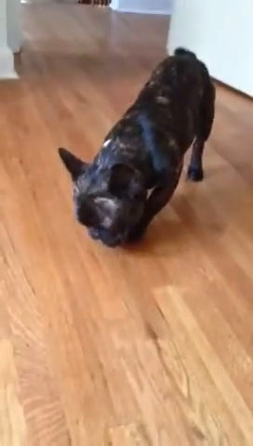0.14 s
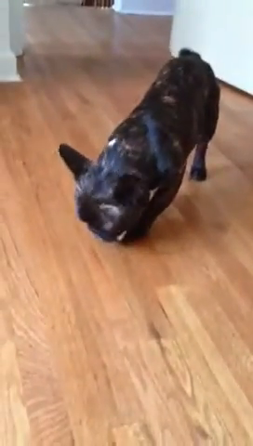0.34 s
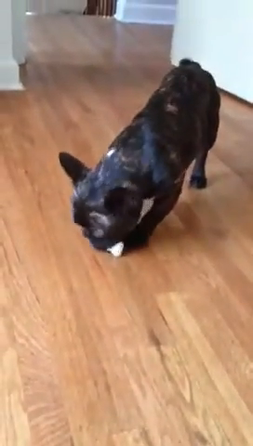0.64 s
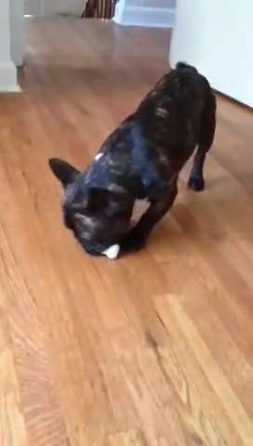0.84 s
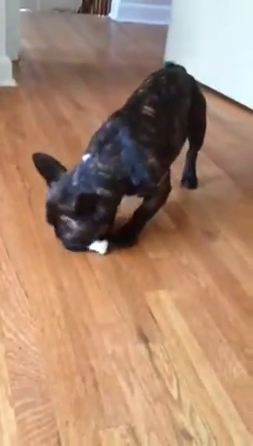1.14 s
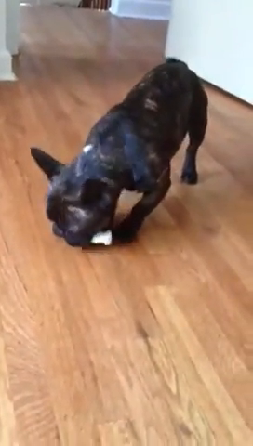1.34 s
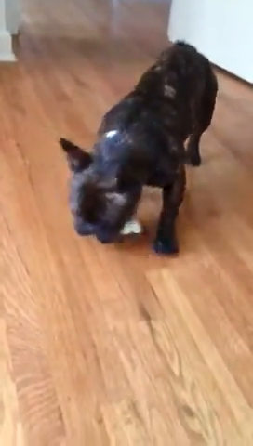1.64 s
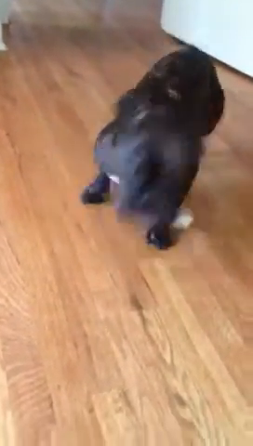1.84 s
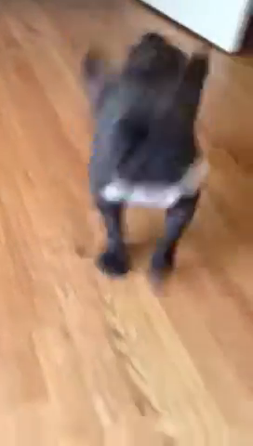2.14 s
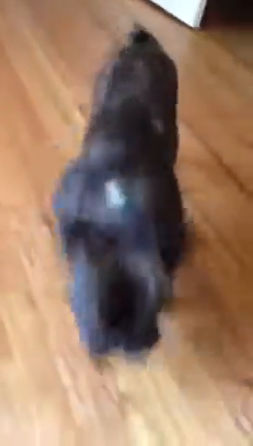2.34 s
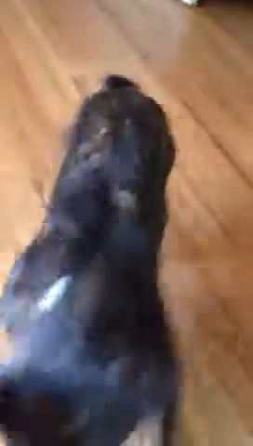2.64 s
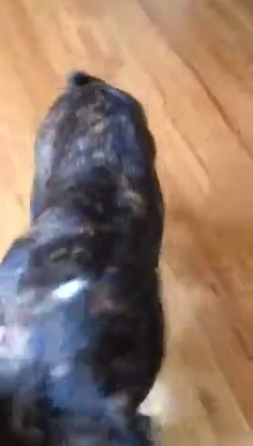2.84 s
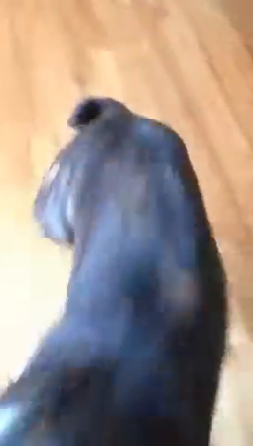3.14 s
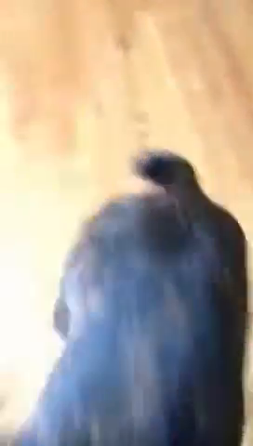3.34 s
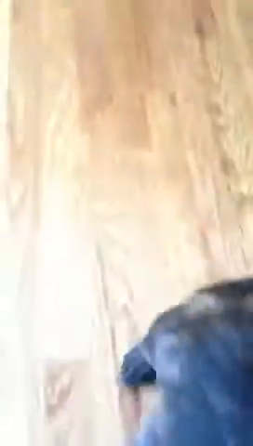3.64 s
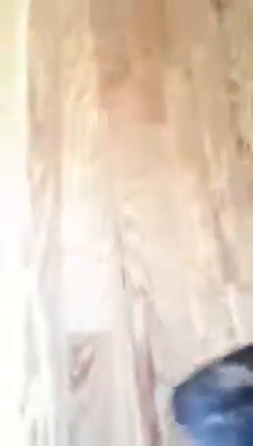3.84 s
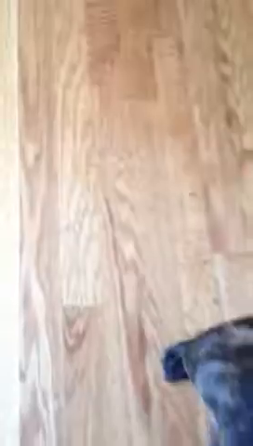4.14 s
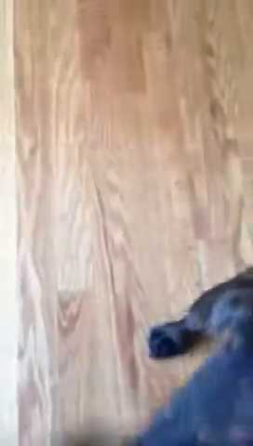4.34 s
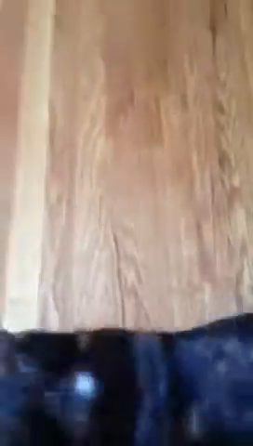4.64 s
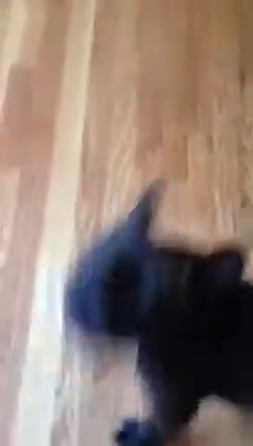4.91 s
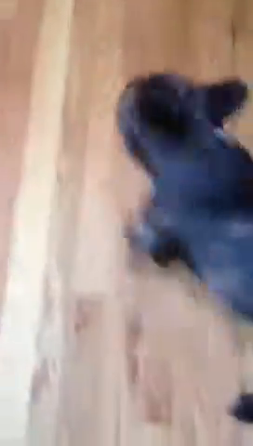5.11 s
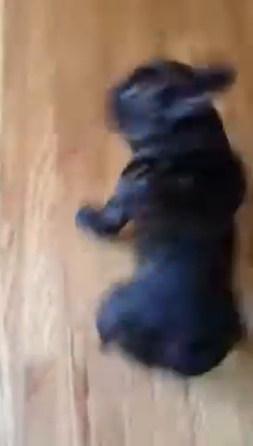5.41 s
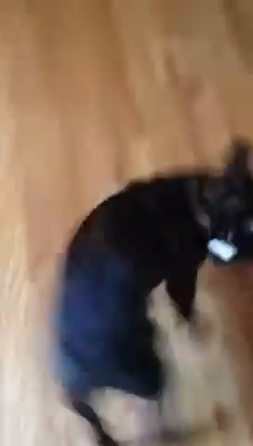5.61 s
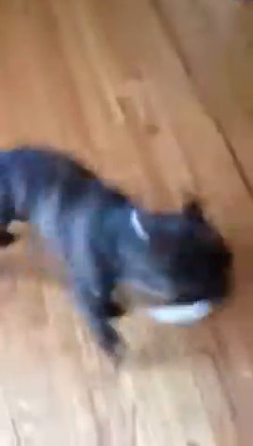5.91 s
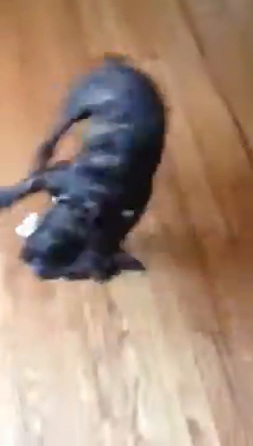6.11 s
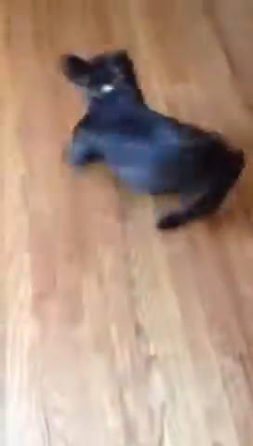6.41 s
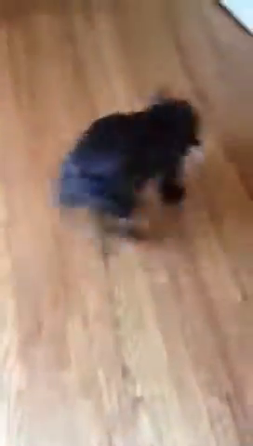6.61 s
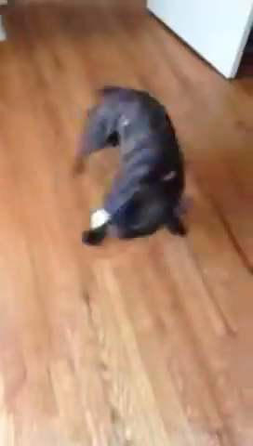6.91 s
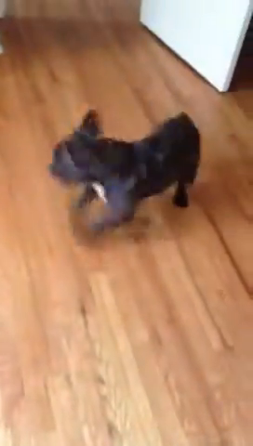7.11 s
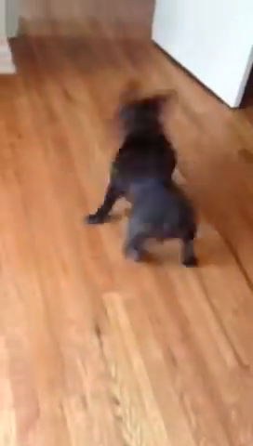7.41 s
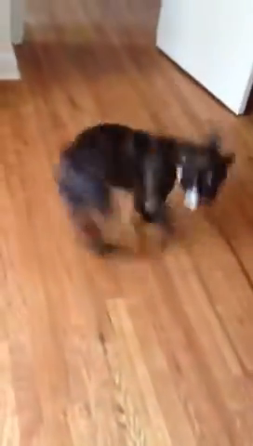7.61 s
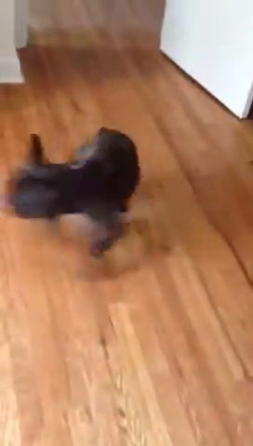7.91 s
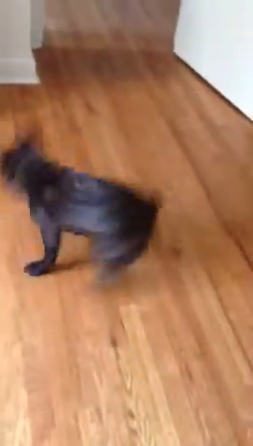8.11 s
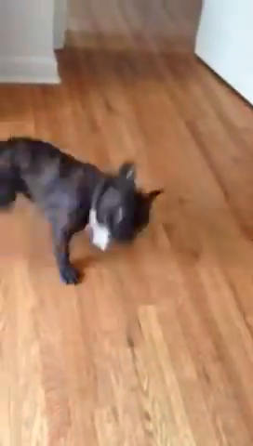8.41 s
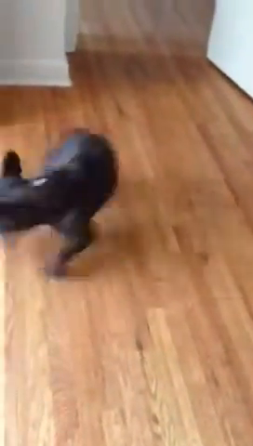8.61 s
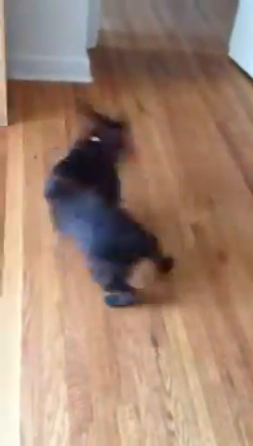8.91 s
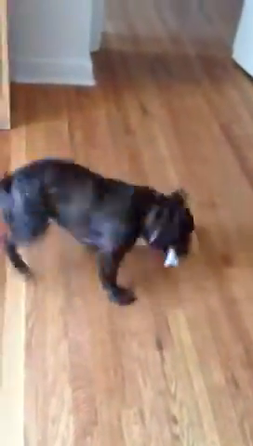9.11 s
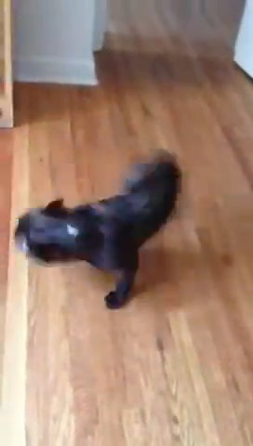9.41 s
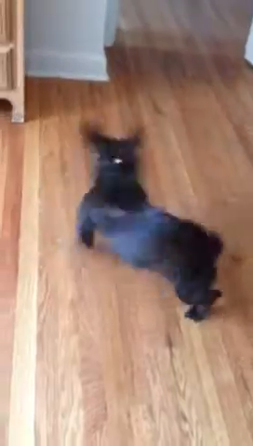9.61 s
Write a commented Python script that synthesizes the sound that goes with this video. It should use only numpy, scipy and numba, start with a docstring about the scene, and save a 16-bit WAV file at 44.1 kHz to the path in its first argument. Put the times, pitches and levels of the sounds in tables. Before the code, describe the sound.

In a bare, echoing room a small flat-nosed dog snuffles quietly at a hard bone, which knocks once on the floorboards. After a few snorts and a squeaky scrape it bounds forward, the bone clacking down loudly and bouncing. Paws thud close by, then claws tick and skid in an increasingly wild scramble with short wet snorts, a tiny grunt and a low growl. One phone microphone, faint house hum.

```python
"""A small flat-nosed dog plays with a hard bone on a wooden floor in a bare, echoing room, heard by one phone microphone.
The bone drops and bounces: short pushes ring the damped modes of bone and boards.
Filtered noise makes the fluttering snorts, the whistling breath, a squeaky scrape and the skids; a grunt sums harmonics.
Claws tick, paws thud and a low throaty growl sounds as short forces ring narrow bands; a low house hum lies underneath."""
import sys
import numpy as np
from scipy import signal
from scipy.fft import rfft, irfft
from scipy.io import wavfile
from scipy.ndimage import uniform_filter1d
from numba import njit

SR = 44100
rng = np.random.default_rng(int(sys.argv[2]) if len(sys.argv) > 2 else 0)


def bounce(signal):
    """Save signal as a 16-bit WAV file at the path given by the first command-line argument."""
    frames = np.transpose(np.atleast_2d(signal))
    limited = np.clip(frames, -1, 1)
    pcm = np.round(limited * 32767).astype(np.int16)
    wavfile.write(sys.argv[1], SR, pcm)


N = 429975

# Modes of the floorboards: centre_hz, width_hz, level_db
BOARD_MODES = [(176, 90, 3.5), (248, 28, 1), (302.5, 31, -2.5), (242, 470, 3.5)]


def undb(db):
    """Gain of a level in dB."""
    return 10 ** (np.asarray(db) / 20)


def unit(x):
    """Scaled to rms 1."""
    return x / np.sqrt(np.mean(x ** 2))


def colour(x, points):
    """Causal minimum-phase filter through (Hz, dB) points, built by folding the cepstrum."""
    hz, db = np.transpose(points)
    grid_hz = np.arange(2049) * SR / 4096
    log_gain = np.interp(np.log(grid_hz + 1), np.log(hz), db) * np.log(10) / 20
    cepstrum = irfft(log_gain)
    cepstrum[1:2048] *= 2
    cepstrum[2049:] = 0
    impulse = irfft(np.exp(rfft(cepstrum)))
    return signal.fftconvolve(x, impulse)[:len(x)]


@njit
def svf(x, hz, width):
    """State-variable band-pass with a moving centre and width, gain 1 at the centre."""
    y, b, l = np.empty(len(x)), 0., 0.
    for i in range(len(x)):
        g, k = np.tan(np.pi * hz[i] / SR), width[i] / hz[i]
        v = (b + g * (x[i] + 1e-18 - l)) / (1 + g * (g + k))
        b, l, y[i] = 2 * v - b, l + 2 * g * v, k * v
    return y


def band(x, hz, width):
    """Band-pass; centre and width in Hz are numbers or curves."""
    return svf(x, hz + np.zeros(len(x)), width + np.zeros(len(x)))


def walk(rate):
    """Random levels held 1 / rate s and slewed twice; spread 1."""
    k = int(SR / rate)
    steps = np.repeat(rng.standard_normal(N // k + 1), k)
    return unit(uniform_filter1d(uniform_filter1d(steps, k), k)[:N])


def add(out, s, sound, db):
    """Mix a short sound in at time s with the given peak level."""
    i = int(s * SR)
    out[i:i + len(sound)] += (undb(db) * sound / np.abs(sound).max())[:N - i]


def burst(t60):
    """A tick of noise that falls 60 dB in t60 s."""
    t = np.arange(4096) / SR
    return rng.standard_normal(len(t)) * undb(-60 * t / t60)


def push(ms):
    """The force of one contact: a quick rise and a fade, longer for softer things."""
    t = np.arange(4096) / SR * 6e3 / ms
    return t ** 2 * np.exp(-t)


def smooth(s, curve):
    """A curve known at the times s, read at every sample."""
    return np.interp(np.arange(N) / SR, s, curve)


def house():
    """Air and machines of the house, with a wavering hum, and the floor working under weight."""
    # Spectrum of the house air: frequency_hz, density_db (per Hz)
    air_points = [(40, -41), (70, -48), (145, -9), (260, -7.5), (450, -12.5), (650, -6), (1460, -13.5),
                  (3400, -15), (7700, -25.5), (15000, -18)]
    # Floor rumbling under the dog: time_s, boards_db, joist_db
    rumble = [(0.0, -50, -73), (0.41, -55.5, -84), (0.97, -52, -75), (1.19, -47.5, -55), (1.57, -55, -65),
              (1.95, -52, -68), (2.5, -54.5, -56), (2.88, -59, -80), (3.15, -50, -55), (3.4, -47.5, -54),
              (3.67, -44, -64), (3.85, -44.5, -53), (4.18, -57, -65), (5.29, -53.5, -70), (5.65, -49, -75),
              (6.3, -54.5, -74), (6.76, -55.5, -72), (7.301, -50.5, -65), (7.96, -57, -66),
              (8.419, -52, -76), (9.75, -53.5, -57)]
    # Joist mode under the boards: centre_hz, width_hz
    joist_mode = 120, 8.6
    air = unit(colour(rng.standard_normal(N), air_points)) * undb(-58 + 1.33 * walk(2.81))

    hum_hz = 249.4 * (1 + 0.00743 * walk(4.5))
    hum_db = -63.5 + 3 * walk(6)
    hum = undb(hum_db) * np.sin(2 * np.pi * np.cumsum(hum_hz) / SR)

    s, boards_db, joist_db = np.transpose(rumble)
    load = rng.standard_normal(N) * undb(2 * walk(25))  # uneven weight
    modes = [undb(g - 10 * np.log10(w)) * band(band(load, hz, w), hz, 3 * w) for hz, w, g in BOARD_MODES]
    boards = unit(sum(modes)) * undb(smooth(s, boards_db))
    joist = unit(band(load, *joist_mode)) * undb(smooth(s, joist_db))
    return air + hum + boards + joist


def slides(peak_s, level_db, rise_s, fall_s, lingers):
    """Level in dB of one band: every slide swells to its peak and fades, and their powers add."""
    t = np.arange(0, N / SR, .002)
    time_20db = lingers * np.where(t < peak_s, rise_s, fall_s)
    away_db = 20 * np.abs(t - peak_s) / time_20db
    return smooth(t, 10 * np.log10(np.sum(undb(level_db - away_db) ** 2, axis=0)))


def skid():
    """Stick-slip of pads and claws: a dense, uneven rain of micro clicks over smooth hiss."""
    # Slides: peak_s, hiss_db, rise_s and fall_s (through 20 dB, before each band's linger factor),
    # mid_share_db, low_share_db (both relative to the hiss)
    slide_table = [(.18, -67, 0.3, .08, -10, -3), (.3, -60.5, 0.17, 0.25, -8, -5),
                   (.58, -64.5, 0.11, 0.79, 4.5, -3), (.97, -68, 0.1, 0.76, 3, -9),
                   (1.4, -68, 0.34, .6, -19, -5), (1.54, -70, 0.7, 0.34, -12, 2),
                   (1.67, -45.5, 0.062, 1, -18, -24), (1.83, -42.5, 0.54, 0.44, -2.5, -15),
                   (2.16, -50.5, 0.095, 0.17, 6, 8), (2.31, -67, .03, .3, 2, -11),
                   (2.41, -42.5, 0.11, 0.12, -1, -14), (2.46, -48, 0.11, 0.1, 5.5, 9),
                   (2.55, -54, 0.16, 0.44, 2.5, 5.5), (2.67, -56, 0.34, 0.13, -5, -14),
                   (3.02, -52, 0.16, 0.27, -18, 7), (3.22, -48.5, 0.27, 0.19, 5.5, -8),
                   (3.34, -57, 0.041, 0.67, -2, -10), (3.47, -46.5, 0.18, 0.22, 6.5, 1),
                   (3.71, -50, 0.25, 0.33, 6.5, -3), (3.85, -50, 0.043, 0.21, 5.5, -15),
                   (4.15, -63, 0.83, 0.55, 2, -3), (4.392, -55, 0.17, 0.23, -0.5, 1),
                   (4.44, -46.5, 0.017, 0.36, -3, 1), (4.56, -48.5, 0.3, 0.72, -21, -14),
                   (4.665, -40, 0.31, 0.25, -6.5, -23), (4.76, -52, 0.22, 0.24, 9, -17),
                   (5.09, -50, 0.054, .3, 4, -1), (5.14, -42, 0.16, 0.21, 3.5, -10),
                   (5.2, -49, .1, 0.084, 4, -12), (5.27, -56, 0.071, 0.39, 5, -5),
                   (5.44, -48.5, 0.099, 0.67, -9, -16), (5.56, -50, 0.18, .6, 0, -4),
                   (5.67, -42, 0.024, 0.03, 7, 8.5), (5.76, -41, 0.076, 0.17, 4, 4),
                   (5.89, -41, 0.059, 0.19, -1, -7), (6.115, -52, 0.03, 0.52, 1, 3),
                   (6.235, -42, 0.018, 0.26, -1, -6), (6.44, -37.5, 0.17, 1, -9, -34),
                   (6.63, -38, 0.67, 0.077, -6, -32), (6.7, -44.5, 0.044, 0.38, 6, -6),
                   (6.764, -40.5, 0.12, 0.11, 2, 0), (6.87, -43, 0.023, 0.13, 4, -4),
                   (6.99, -41, 0.077, 0.25, -0.5, -11), (7.045, -41, 0.039, .2, -4.5, -14),
                   (7.1, -43, 0.042, 0.19, 11.5, 4), (7.38, -37, 0.28, 0.4, -10, -32),
                   (7.659, -43.5, 1, 0.21, 1, -10), (7.79, -39, 0.019, 0.36, -9, -8.5),
                   (8.02, -46.5, 0.076, 0.23, 2.5, -5), (8.19, -33.5, 0.36, 0.19, -7, -25),
                   (8.36, -40.5, 0.3, 0.2, 3, -1), (8.509, -31.5, 0.016, 0.15, -6, -4),
                   (8.72, -51.5, 0.48, 1, 3.5, -10), (8.83, -35.5, 0.016, 0.17, -2, -23),
                   (8.855, -35.5, 0.18, 0.17, -6.5, -28), (9.0, -50.5, .8, 0.47, 1, 1),
                   (9.11, -47.5, .8, 0.086, -9, 0), (9.183, -37, 0.0083, 0.17, 0, -9),
                   (9.49, -39.5, 0.31, 0.25, -5.5, -8), (9.52, -34.5, 0.032, 0.23, -1, -8)]
    peak_s, hiss_db, rise_s, fall_s, mid_share_db, low_share_db = np.transpose(slide_table)[:, :, None]
    # duller bands swell and fade more slowly
    db = slides(peak_s, hiss_db, rise_s, fall_s, 0.62)
    mid_db = slides(peak_s, hiss_db + mid_share_db, rise_s, fall_s, 0.8)
    low_db = slides(peak_s, hiss_db + low_share_db, rise_s, fall_s, 1.38)
    hiss_hz = np.clip(8880 - 170 * (mid_db - db), 6800, 11800)  # a heavier mid goes with a darker hiss

    click_size = undb(4 * np.minimum(rng.exponential(size=N), 4.5))
    clicks = .5 * click_size * (rng.random(N) < .02)
    unevenness = undb(0.85 * walk(60) + 1.0 * walk(150))
    grit = rng.standard_normal(N) * (1 + clicks) * unevenness

    hiss = unit(band(grit, hiss_hz, 1500)) + undb(5) * unit(band(grit, 10500, 9000))
    mid = unit(band(grit, 3500, 1900)) + undb(3.5) * unit(band(grit, 4470, 3340))
    low = unit(band(band(grit, 1900, 3200), 1940, 3300))
    return undb(db - 6.0) * hiss + undb(mid_db - 11.0) * mid + undb(low_db - 7.5) * low


def claws():
    """Nail on varnish: a bright tick with a scratch behind it, and a duller knock."""
    # Claw taps: time_s, level_db, knock_db, knock_hz, wall_db (share sent to the walls)
    taps = [(0.135, -48.5, -3, 1840, 0), (0.243, -47.5, -13, 3520, 7), (0.322, -44, -13, 2280, 2),
            (0.547, -46, 2, 2500, -4), (0.869, -54, -25, 4500, -4), (0.923, -53, -25, 4500, 0),
            (1.0084, -57, 11, 2360, 4), (1.089, -53, -25, 4500, -4), (1.3104, -44, -25, 4500, -4),
            (1.343, -43, -8, 1830, -7.5), (1.3753, -56, -11, 2310, 11), (1.4696, -46, -7, 1840, 6),
            (1.488, -52, -27, 4500, -3), (1.527, -43, 9.5, 3720, -7), (1.6097, -55, -8, 4690, 2),
            (2.0747, -48, -15, 4400, -2), (2.0862, -42, 6, 2290, -10), (2.137, -42, -20, 4400, 2),
            (2.1418, -32, -2.5, 2120, 1.5), (2.309, -28.5, -18, 4100, -2), (2.358, -31, -5.5, 4350, 4),
            (2.389, -20, -13, 4400, -3), (2.434, -26.5, -1, 2600, -3), (2.536, -37, -21, 4620, 3),
            (2.555, -31.5, -14, 2030, -1), (2.6142, -34, -20, 4680, 7.5), (2.656, -35, -17, 4650, 6),
            (3.0145, -40, -23, 4500, -6), (3.058, -34.5, -14, 2150, 0), (3.332, -32, -14, 2780, 3),
            (3.4497, -34, 3, 1740, 5), (3.464, -28, -3, 3350, 1), (3.68, -37.5, -0.5, 3120, 8.5),
            (3.833, -23, -25, 4500, -0.5), (4.4316, -24, -17, 4660, 0.5), (4.434, -29, -15, 4620, -3),
            (4.9297, -53, -22, 4460, -16), (5.0414, -38, -1, 3070, 1), (5.2636, -34, -23, 4590, 3),
            (5.331, -34, -15, 4380, -3), (5.44, -30, -12, 4550, 1.5), (5.6467, -21.5, -19, 4420, 6),
            (5.7467, -30, -21, 4770, -5), (5.859, -22, -18, 4340, 0.5), (5.89, -25, -25, 4660, 1),
            (6.106, -33, -11, 3850, -2), (6.115, -43.5, 3, 3780, 5), (6.222, -25, -21, 4700, -5),
            (6.233, -28, -11, 2500, 0), (6.3761, -29.5, -13, 1840, 6.5), (6.698, -25, -3, 4560, -5),
            (6.861, -30, -20, 4660, 4), (6.866, -24.5, -22, 4660, -0.5), (7.0862, -30, -10, 4540, 8),
            (7.283, -33, -5, 2370, -3), (7.7484, -31, -8, 2870, 5), (7.7888, -27, -18, 4630, 4),
            (8.036, -24, -13, 4730, -3), (8.345, -26, -23, 4400, 3.5), (8.407, -23.5, -18, 4730, 3.5),
            (8.498, -16, -15, 4100, 3.5), (8.682, -29.5, -13, 2270, 2.5), (8.8244, -23.5, -29, 4750, 7.5),
            (9.0068, -25, -18, 4770, 0.5), (9.072, -24, -8, 4270, -7), (9.081, -25, -20, 4500, -3),
            (9.177, -16.5, -14, 4470, -1), (9.363, -25, -17, 2800, 4.5), (9.5121, -27.5, -26, 4660, 11)]
    near, far = np.zeros(N), np.zeros(N)
    for s, db, knock_db, knock_hz, wall_db in taps:
        roughness = undb(6 * rng.standard_normal(64)).repeat(64)
        scratch = 0.09 * burst(.04) * roughness
        direct = near, push(0.051) + scratch, db + 5.0
        to_walls = far, push(0.078), db + wall_db + 11.5
        for out, nail, gain_db in (direct, to_walls):
            add(out, s, band(nail, 11320, 10600), gain_db)
            knock = band(band(nail, knock_hz, 900), knock_hz, 4000)
            add(out, s, knock, gain_db + knock_db - 5.5)
    return near, far


def breaths():
    """Each snort opens fast, slides from its first level and resonance to its last, and shuts; the loudest one leads."""
    # Snorts: start_s, length_s, start_level_db, end_level_db, start_nose_hz, end_nose_hz, open_mouth_db
    snort_table = [(0.255, 0.19, -51.5, -63, 1080, 893, -1.5), (0.45, .01, -52, -55, 815, 830, -9),
                   (0.585, 0.029, -47, -45, 1040, 980, -15), (1.008, 0.22, -44, -49, 860, 890, -6),
                   (1.513, 0.17, -51.5, -63, 990, 1030, 0), (1.792, 0.18, -37, -63, 845, 1000, -8),
                   (2.075, 0.15, -45, -47, 1080, 980, -4.5), (3.187, 0.11, -44, -52, 830, 935, -8),
                   (3.411, 0.14, -44, -43.5, 1200, 940, -5), (3.82, 0.11, -51, -44.5, 915, 840, -8),
                   (3.993, 0.036, -44, -45, 790, 804, -9), (4.07, 0.043, -44, -50, 880, 900, -9),
                   (4.106, 0.076, -58, -64, 804, 890, -8.5), (4.471, 0.026, -49, -42, 960, 930, -2),
                   (4.484, 0.12, -43, -52.5, 914, 920, -16.5), (4.634, .015, -51, -46, 940, 915, -7),
                   (4.705, 0.07, -58, -52, 950, 1090, -1.5), (5.738, .03, -41, -43, 1190, 1200, -9),
                   (5.778, 0.12, -34.5, -51, 1170, 1130, -13), (6.113, 0.075, -46, -39.5, 1100, 1050, -15),
                   (6.25, 0.066, -55, -63, 1060, 922, 3), (6.741, 0.11, -44.5, -52, 1290, 1290, -13),
                   (6.852, 0.14, -50, -49, 1230, 960, -11), (7.053, 0.044, -41, -55, 870, 950, -16),
                   (7.411, 0.062, -40, -40.5, 1060, 1040, -12), (7.468, .04, -40.5, -44, 1150, 1260, -3.5),
                   (7.507, 0.22, -35.5, -52.5, 1220, 1340, -5.5), (7.744, 0.013, -51, -45, 950, 950, -1),
                   (8.111, 0.068, -29.5, -32.5, 1030, 1050, -12), (8.185, .07, -40, -42, 1050, 1060, -2.5),
                   (8.267, 0.19, -43.5, -54, 1150, 1250, -5.5), (8.43, .005, -41, -43, 1110, 1110, -14),
                   (8.693, 0.07, -57, -65, 1240, 1090, 3), (8.777, 0.069, -47, -37.5, 1100, 1080, -9.5),
                   (8.886, 0.11, -48, -45, 1490, 1550, -7), (8.99, 0.12, -42, -53, 1520, 1480, -4),
                   (9.192, 0.12, -43, -59, 1240, 1160, -2.5), (9.366, .05, -56, -54, 1090, 1190, -7),
                   (9.434, 0.096, -52.5, -40, 1080, 970, -3.5), (9.534, 0.06, -36.5, -49, 1020, 950, -3),
                   (9.618, 0.12, -43.5, -52, 1530, 1520, -5)]
    attack_db_per_s, release_db_per_s = 1800, 650
    t = np.arange(0, N / SR, .001)
    s, length, db0, db1, hz0, hz1, mouth_db = np.transpose(snort_table)[:, :, None]
    done = np.clip((t - s) / length, 0, 1)
    before_db = attack_db_per_s * np.maximum(s - t, 0)
    after_db = release_db_per_s * np.maximum(t - s - length, 0)
    db = db0 + (db1 - db0) * done - before_db - after_db
    nose_hz = hz0 + (hz1 - hz0) * done
    lead = db.argmax(axis=0), np.arange(len(t))
    return smooth(t, db[lead]), smooth(t, nose_hz[lead]), smooth(t, mouth_db[lead[0], 0])


def snorts(flutter_hz=62, depth=0.36):
    """Air past a loose palate: uneven flaps chop the flow, which rings the nose;
    an opening mouth damps that ring and lets the throat through."""
    # The nose pops open: time_s, level_db, ring_hz
    pops = [(0.257, -42, 1120), (0.328, -42, 655), (1.024, -28, 890), (1.788, -26.5, 830),
            (1.851, -31, 930), (2.085, -39, 1210), (2.432, -37.5, 1420), (3.441, -28.5, 1080),
            (3.819, -28.5, 1000), (3.857, -33, 910), (4.05, -34.5, 960), (4.469, -45, 1030),
            (4.496, -25.5, 975), (4.993, -43, 1130), (5.747, -29, 1190), (6.122, -44, 1010),
            (6.231, -31, 634), (6.568, -34, 680), (7.049, -49, 950), (7.415, -34, 1090), (8.108, -48, 980),
            (8.5, -30.5, 1300), (8.822, -42, 1120), (9.362, -41, 1020)]
    db, nose_hz, mouth_db = breaths()
    phase = np.cumsum(flutter_hz * undb(2.5 * walk(30))) / SR % 1
    flaps = 1 - depth + 2.5 * depth * np.exp(-phase / .3)
    flow = rng.standard_normal(N) * flaps * undb(1.35 * walk(40))

    width = np.clip(450 * undb(mouth_db), 60, 900)
    nose = unit(band(band(flow, nose_hz, width), nose_hz, 3.0 * width) / np.sqrt(width))
    throat = unit(band(band(flow, 380, 140), 350, 220))
    mouth = unit(band(band(flow, 1.03 * nose_hz, 920), 2.2 * nose_hz, 1500))
    opening = undb(mouth_db) * (undb(-4.0) * throat + undb(-11.0) * mouth)
    out = undb(db) * (nose + opening)
    for s, pop_db, hz in pops:
        add(out, s, band(push(0.84) + 0.31 * burst(0.047), hz, 100), pop_db + 0.5)
    return out


def paws_and_growl():
    """A soft push thumps and booms in a narrow band, longer when deeper, with a slap of noise on top;
    paws on boards, and one low throaty growl made the same way."""
    # Paw thuds, and at 8.129 s a low throaty growl: time_s, level_db, boom_hz, slap_db
    thud_table = [(0.339, -37.5, 220, -5.5), (0.436, -44, 252, -10), (1.183, -55, 278, -9),
                  (2.108, -36, 291, -9), (2.433, -48.5, 258, 5.5), (2.753, -32, 202, -20),
                  (2.966, -34, 254, -10), (3.019, -43, 300, -6), (3.136, -28, 310, -11.5),
                  (3.193, -27.5, 282, -9.5), (3.263, -31.5, 228, -12.5), (3.283, -33, 268, -16),
                  (3.318, -37.5, 150, -22), (3.43, -33, 251, -31), (4.374, -45, 243, -6.5),
                  (4.431, -37.5, 264, -19), (5.009, -39, 200, -6), (5.647, -37, 198, -5),
                  (5.724, -34.5, 196, -16), (5.874, -55.5, 248, 8), (6.121, -35, 187, -9.5),
                  (6.237, -38.5, 250, 2.5), (6.504, -35, 200, -21), (6.572, -31.5, 177, -6.5),
                  (6.589, -30, 348, -26), (6.72, -37, 175, -18), (6.946, -34, 221, -11),
                  (6.968, -38.5, 280, -6), (7.405, -38, 362, -9), (7.533, -46, 253, 8),
                  (7.737, -39.5, 198, -3.5), (7.801, -31, 200, -13.5), (7.858, -40, 192, -24),
                  (8.035, -37, 192, -19), (8.071, -42.5, 190, 3), (8.09, -33, 197, -7),
                  (8.129, -31.5, 400, -0.5), (8.507, -36, 324, -13), (8.72, -38, 197, -1),
                  (8.842, -31.5, 207, -7.5), (9.185, -43, 173, -22), (9.416, -46.5, 175, -2)]
    out = np.zeros(N)
    for s, db, hz, slap_db in thud_table:
        boom = band(band(push(1.34), hz, 36 * (hz / 250) ** 1.5), hz, 300)
        thump = band(push(1.08), 1.15 * hz, 220)
        slap = band(band(burst(0.27), 440, 650), 470, 800)
        add(out, s, boom, db - 5.5)
        add(out, s, thump, db - 7.0)
        add(out, s, slap, db + slap_db + 3.5)
    return out


def bone():
    """A short push rings the damped modes of bone and board, the other end lands, a brief rattle and a hard
    echo follow; one narrow ring of the bone lingers and the floor booms."""
    # Drops: time_s, level_db, contact_ms, hollow_db, rattle_db, crack_db, wall_db (share sent to the walls),
    # other_end_db, ring_hz, ring_db (lingering ring), boom_db (floor)
    drops = [(0.581, -34, 1, 18, -19, -30, -1, -10, 1000, -30, -30),
             (0.6299, -11, 0.56, 11, -9.5, -36, 3.5, -22, 854, -13.5, -28),
             (2.6955, -1.5, 0.34, 10, -23, 4.5, 4, 15.5, 805, -21.5, -24.5),
             (2.7827, -3.5, 0.15, -9, -13, -27, 3, -25, 408, -20, -28),
             (2.9157, -14.5, 0.35, 1, -8, -19, 6.5, -23, 287, -18, -39)]
    # Modes of the bone: centre_hz, width_hz, level_db
    bone_modes = [(348, 59, -14), (1140, 630, -14), (1425, 370, 10.5), (1830, 2600, 24), (2680, 270, 21.5),
                  (3970, 2300, -19)]
    # Marrow cavity: centre_hz, width_hz
    hollow = 920, 170
    other_end_s, rattle_s, far_wall_s, boom_s = .00095, 0.000976, .0123, 0.00414  # delays
    near, far = np.zeros(N), np.zeros(N)
    for s, db, ms, hollow_db, rattle_db, crack_db, wall_db, other_db, ring_hz, ring_db, boom_db in drops:
        modes = bone_modes + [(*hollow, hollow_db)]
        knock = -sum(undb(g) * band(band(push(ms), hz, w), hz, 4.0 * w) for hz, w, g in modes)
        knock = band(knock, 1500, 3000)
        crack = band(push(0.08), 9700, 11000)
        knock = knock / np.abs(knock).max() + undb(crack_db) * crack
        knock = knock + undb(other_db) * np.roll(knock, int(other_end_s * SR))
        rattle = np.convolve(knock, burst(0.069))[:len(knock)]
        add(near, s, knock, db)
        add(near, s + rattle_s, rattle, db + rattle_db)
        add(near, s + far_wall_s, knock, db + wall_db - 13)  # one hard echo
        add(far, s, knock, db + wall_db)
        ring = band(push(ms), ring_hz, 38)
        boom = sum(undb(g) / w * band(push(1.1), hz, w) for hz, w, g in BOARD_MODES)
        for out in near, far:
            add(out, s, ring, db + ring_db)
            add(out, s + boom_s, boom, db + boom_db)
    return near, far


def swell(length, fade):
    """Time from 0 to 1 through a sound, and its envelope with soft ends."""
    t = np.arange(int(length * SR)) / SR
    return t / length, np.clip(np.minimum(t, length - t) / fade, 0, 1)


def whistles_and_scrape():
    """Narrow, sliding bands of noise: whistling breath and a squeaky scrape."""
    # Whistling breath, and near 1.53 s a squeaky scrape: start_s, length_s,
    # start_level_db, end_level_db, start_pitch_hz, end_pitch_hz, width_hz
    narrow_bands = [(.97, .07, -68, -70, 8100, 8100, 404), (1.006, 0.13, -64, -75, 6800, 5800, 600),
                    (1.335, .12, -53, -64, 8840, 8800, 150), (1.46, 0.1, -62, -64, 8300, 8100, 300),
                    (1.524, 0.078, -45, -60, 3760, 3500, 150), (1.662, 0.3, -50.5, -57, 4460, 4640, 200),
                    (1.686, .13, -52, -52, 3500, 3450, 130), (3.406, 0.22, -46, -51, 3450, 3570, 150),
                    (3.463, 0.13, -63, -52, 4720, 4740, 100), (4.06, 0.1, -58, -63, 3920, 3780, 200),
                    (4.295, 0.078, -56, -54, 10200, 10000, 500), (4.364, .06, -60, -65, 4700, 4800, 300),
                    (6.355, .045, -52, -49, 2250, 1900, 150), (6.573, .045, -52, -53, 656, 640, 200),
                    (6.229, .03, -48, -52, 650, 650, 150), (8.838, 0.058, -46, -47, 560, 560, 200),
                    (5.74, 0.095, -44, -49, 780, 800, 160), (6.113, 0.062, -45, -49, 860, 875, 80),
                    (6.74, 0.075, -47, -48, 915, 890, 90), (7.4, 0.25, -43.5, -49.5, 3640, 3850, 350),
                    (7.413, 0.037, -36, -45, 904, 910, 80), (7.48, 0.14, -52, -44, 1400, 1600, 250),
                    (7.698, 0.41, -50, -57, 7870, 8400, 250), (7.701, 0.11, -47, -40, 11700, 12000, 250),
                    (7.7, 0.24, -50, -62, 12500, 12500, 200), (7.84, .15, -60, -61, 10800, 10750, 200),
                    (8.112, 0.085, -47, -40, 1300, 1960, 250), (8.14, 0.1, -45, -51, 4500, 4460, 250),
                    (8.27, 0.054, -39, -45, 1410, 1400, 120), (8.347, 0.055, -45, -53, 4320, 4300, 250),
                    (8.514, .11, -37, -56, 2740, 2830, 150), (8.5, 0.082, -46, -56, 3950, 3870, 250)]
    out, hiss = np.zeros(N), rng.standard_normal(N)
    for s, length, db0, db1, hz0, hz1, width in narrow_bands:
        done, shape = swell(length, 0.0082)
        i = int(s * SR)
        part = slice(i, i + len(done))
        hz = hz0 + (hz1 - hz0) * done
        tone = unit(band(band(hiss[part], hz, width), hz, 3 * width))
        out[part] += tone * shape * undb(db0 + (db1 - db0) * done)
    return out


def grunt():
    """The vocal folds join the breath: harmonics of a slightly wavering pitch under a soft-ended envelope."""
    # Voiced grunts: start_s, length_s, pitch_hz, level_db
    voiced = [(7.518, 0.074, 345.4, -40)]
    # Harmonics from the fundamental up: level_db
    harmonics_db = [2, -6, 0, 1, -18]
    out, wobble = np.zeros(N), walk(40)
    for s, length, hz, db in voiced:
        done, shape = swell(length, 0.026)
        i = int(s * SR)
        part = slice(i, i + len(done))
        phase = 2 * np.pi * np.cumsum(hz * (1 + 0.016 * wobble[part])) / SR
        voice = sum(undb(g) * np.sin((k + 1) * phase) for k, g in enumerate(harmonics_db))
        out[part] += undb(db) * shape * voice
    return out


def room(x):
    """Diffuse echo of bare walls: bands of noise that die at their own rates after the first reflection."""
    # Bands of the echo: centre_hz, t60_s, level_db
    echo_bands = [(142, 0.55, 11), (252, 0.36, 7.5), (563, 1, 1.5), (898, 0.61, 4.5), (2090, 0.61, 5),
                  (3940, 0.66, 3), (7300, 0.65, 3), (11700, 0.52, 3.5)]
    first_wall_s = 0.0047
    t, tail = np.arange(SR) / SR, 0
    for hz, t60, db in echo_bands:
        noise = band(band(rng.standard_normal(SR), hz, .9 * hz), hz, .9 * hz)
        tail = tail + unit(noise) * np.sqrt(hz) * undb(db - 60 * t / t60)
    early = 0.19 * (t > .0015)  # floor and furniture answer before the walls
    tail = tail * np.clip((t - first_wall_s) / 0.0013, early, 1)
    tail = tail * undb(1.3 * walk(300)[:SR])  # reflections arrive in clumps
    return signal.fftconvolve(x, tail / np.sqrt(np.sum(tail ** 2)))[:N]


def scene():
    """Each source is heard directly and again from the walls; one microphone feeds both channels."""
    knock, knock_far = bone()
    ticks, ticks_far = claws()
    thuds, slide = paws_and_growl(), skid()
    nose = snorts() + whistles_and_scrape() + grunt()
    near = knock + ticks + thuds + undb(-1.5) * nose + undb(2.5) * slide
    to_walls = knock_far + ticks_far + undb(-5.0) * thuds + undb(-8.0) * nose + undb(-7.5) * slide
    return np.tile(near + room(to_walls) + house(), (2, 1))


def record(dry):
    """One fixed tone curve colours the sound, with a narrow dip near 5 kHz; the top is cut above 15450 Hz."""
    # Overall tone curve: frequency_hz, gain_db
    tone_curve = [(30, -21), (75, -12.5), (130, -6.5), (200, 0.5), (2900, -2), (3600, -2.5), (4300, -0.5),
                  (4750, 3.5), (5150, -6.5), (6000, -1), (10000, -8), (13000, -6), (15500, -12)]
    wet = np.array([colour(c, tone_curve) for c in dry])
    top_cut = signal.ellip(10, .2, 80, 15450, fs=SR, output="sos")
    return signal.sosfilt(top_cut, wet)


dry = scene()
out = record(dry)
bounce(out)
```